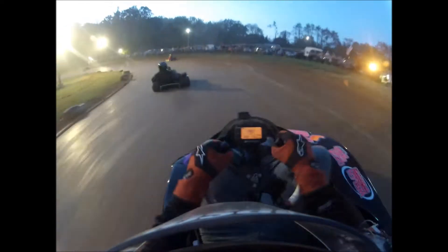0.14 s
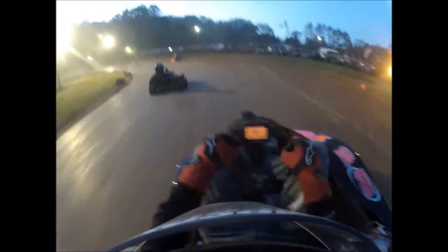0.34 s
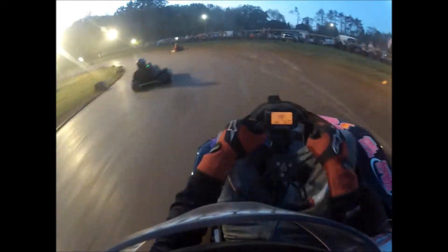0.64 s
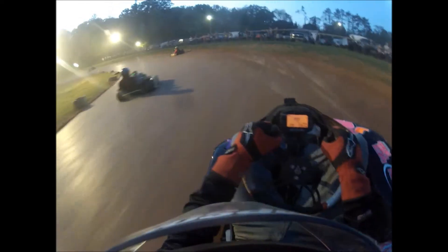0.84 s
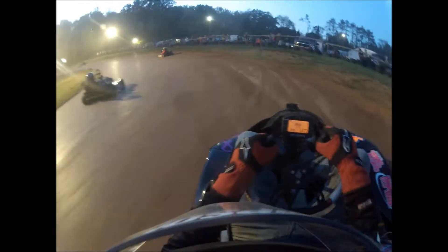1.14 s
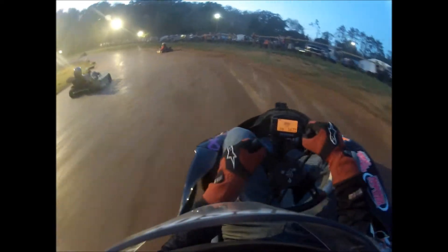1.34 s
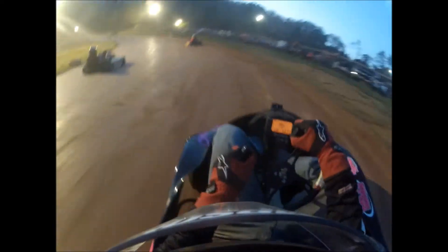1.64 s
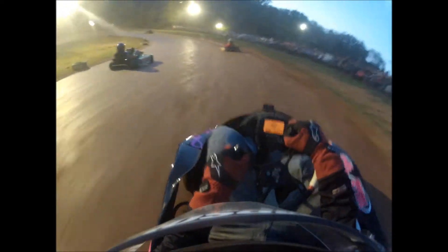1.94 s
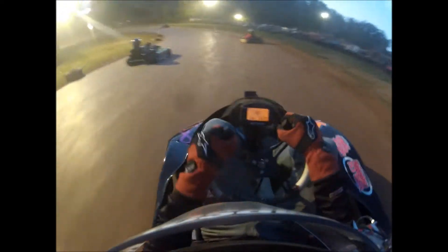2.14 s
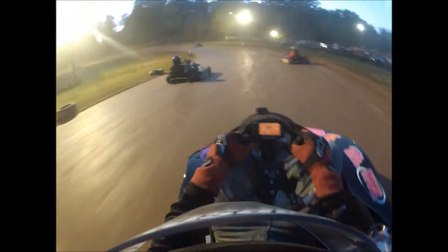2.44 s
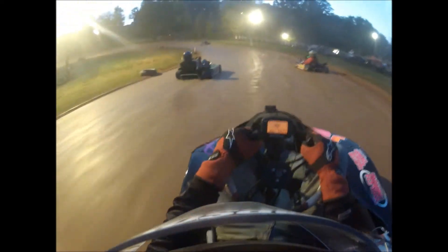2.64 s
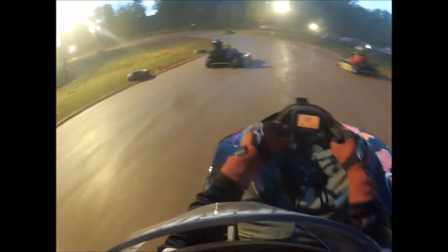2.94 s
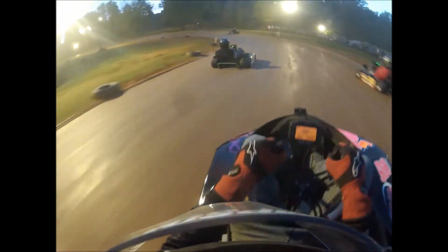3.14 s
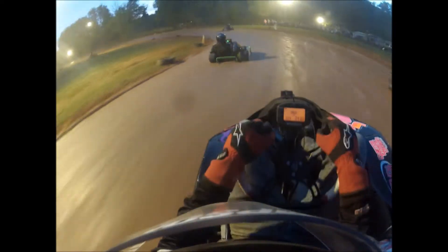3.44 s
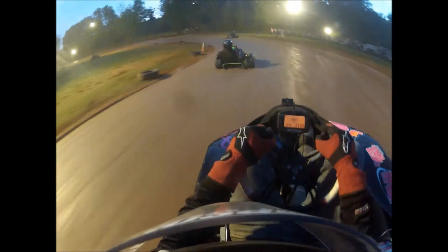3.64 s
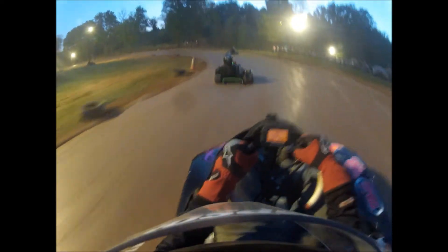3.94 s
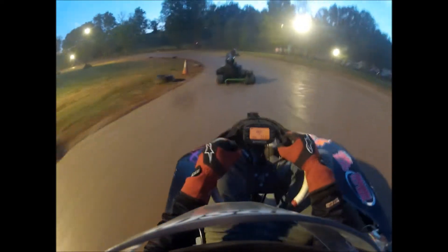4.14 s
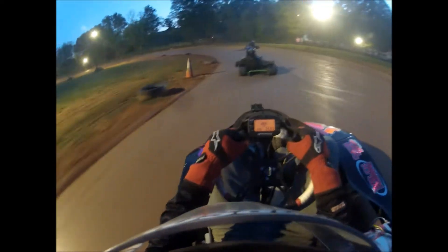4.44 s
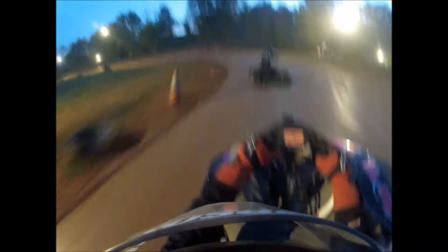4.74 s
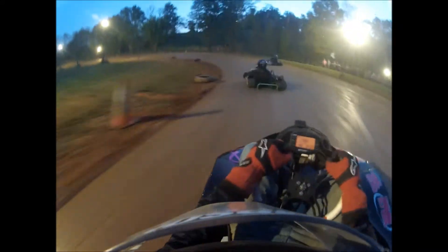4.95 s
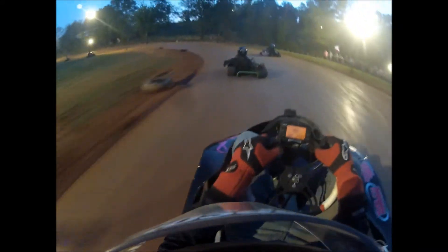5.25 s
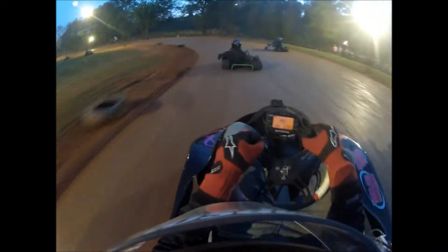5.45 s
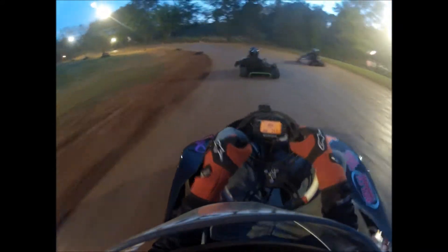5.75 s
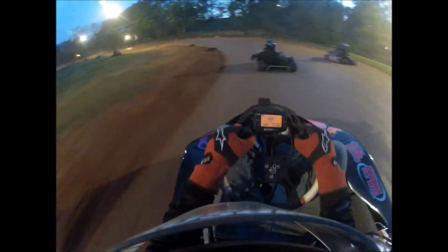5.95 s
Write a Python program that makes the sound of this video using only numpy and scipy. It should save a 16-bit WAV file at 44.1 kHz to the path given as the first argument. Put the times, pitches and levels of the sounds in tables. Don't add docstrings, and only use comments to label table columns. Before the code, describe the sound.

A single-cylinder kart engine rattles and hums on a dirt track, breaking into short runs of hard exhaust pops as the driver blips the throttle.

```python
import sys
import numpy as np
from scipy import signal
from scipy.io import wavfile

SR = 44100
rng = np.random.default_rng(int(sys.argv[2]) if len(sys.argv) > 2 else 0)


def log_audio(samples):
    frames = np.atleast_2d(samples).T
    limited = np.clip(frames, -1, 1)
    pcm = np.round(limited * 32767).astype(np.int16)
    wavfile.write(sys.argv[1], SR, pcm)


def voltage_ratio(level):
    return 10 ** (np.asarray(level, float) / 20)


N = 269451

# (pitch [Hz], level [dB], time to fall 60 dB [s])
PIPE_TONES = [
    (195.4, 1.5, 0.049),
    (179, -13.5, 0.12),
    (281.5, -2.5, 0.037),
    (360, -18.5, 0.032),
    (472, -12.5, 0.061),
]
# (pitch [Hz], width [Hz], level [dB])
HOUSING_TONES = [(694, 35, -17), (908.6, 60.6, -4), (1193, 148, -12), (1490, 140, -6.5), (1737, 117, -1),
                 (1903, 142, -9), (1938, 78, -8.5), (2410, 460, -11.5), (2756, 276, -10),
                 (2886, 250, -12.5), (3116, 330, -7), (3322, 325, -9), (3621, 397, -5.5), (3729, 292, -7.5),
                 (4200, 150, -18), (4255, 810, -20), (5076, 104, -10.5), (5395, 590, -19)]
# (pitch [Hz], width [Hz], level [dB])
FRAME_TONES = [
    (119, 44, -5),
    (217.7, 18.6, 3),
    (335, 93, -8.5),
    (398, 237, -10.5),
    (560, 95, -12),
]
# (pitch [Hz], width [Hz], level [dB])
SHELL_TONES = [
    (3584, 100, -3),
    (912, 20, -17),
    (1740, 17, -24),
    (2362, 25, -10),
    (4950, 48, -12.5),
]
# (multiple of crank speed [-], level [dB])
CRANK_SHAKES = [
    (1, 0),
    (1.5, -8),
    (2, -8),
]
# (multiple of crank speed [-], level [dB])
COASTING_TONES = [(2, -7), (2.5, 5.5), (3, 1), (3.5, 5), (4, -1.5), (4.5, 0), (5, -6), (5.5, -1), (6, -2)]
# (time [s], firing rate [Hz], level [dB])
DISTANT_DRONE = [(0.0, 33.88, -46), (0.5, 31.98, -51), (0.9, 30.46, -54), (1.55, 32.85, -56),
                 (1.77, 32.27, -46), (2.0, 35.17, -41), (2.3, 36.02, -60), (2.64, 34.6, -40.5),
                 (2.85, 32.3, -44.5), (3.05, 33.46, -41), (3.38, 31.7, -42.5), (3.64, 34.03, -53),
                 (3.93, 35.4, -41), (4.3, 35.63, -58), (4.97, 35.42, -40.5), (5.53, 32.95, -46.5),
                 (5.76, 33.57, -47), (6.11, 34.3, -41)]
# (time [s], peak level [dB])
DISTANT_POPS = [(0.0937, -18), (0.1276, -23), (0.284, -18), (0.346, -20), (0.6723, -13), (0.7451, -23),
                (0.781, -20), (0.8174, -16), (0.8533, -16), (0.886, -17), (0.97, -20), (2.4537, -16),
                (2.5399, -15.5), (2.6289, -16), (2.6548, -16.5), (2.684, -11), (3.1693, -18), (3.2976, -18),
                (3.3842, -31), (3.4116, -20), (3.4725, -17.5), (4.0038, -17), (4.0525, -16), (4.7896, -14),
                (4.8265, -19), (4.9457, -18), (5.0001, -20), (5.0875, -10), (5.3591, -18), (5.7547, -19)]
# (time [s], pitch [Hz], level [dB])
CHAIN_WHINE = [
    (4.701, 560, -38),
    (4.77, 592, -53),
    (4.93, 589.6, -58),
    (5.096, 555.0, -43),
    (5.622, 588.6, -60),
    (5.676, 558.6, -63),
    (5.78, 588, -54),
    (6.11, 587, -39),
]
# (first pop [s], first gap [ms], gap at full speed [ms], pops [count])
THROTTLE_BLIPS = [(0.497, 43.3, 26.2, 4), (1.0848, 36.8, 24.2, 5), (1.4091, 34.4, 27.5, 5),
                  (1.6745, 35.5, 29.4, 7), (2.0967, 44.4, 28.8, 6), (2.7643, 42.3, 23.5, 4),
                  (3.513, 35.2, 27.6, 4), (3.764, 35.7, 27.4, 8), (4.3621, 42.3, 31.9, 5),
                  (4.6062, 30.4, 27.7, 6), (5.0904, 37.7, 27.1, 6), (5.5171, 38.6, 28.1, 6),
                  (5.9641, 41.7, 27.0, 5)]
# (hardest crack [dB], its place in the blip [0-1], first pop weaker by [dB],
# last pop weaker by [dB], thump [dB])
BLIP_STRENGTHS = [(-10, 0.3, 3, 4.5, -16.5), (-10.5, 0.37, 1, 5.5, -16.5), (-11.5, .4, 5.5, 5, -15.5),
                  (-11.5, .65, 6, 4, -14.5), (-11, 0.87, 12.5, 8.5, -15.5), (-10.5, 0.46, 2, 5.5, -16.5),
                  (-10.5, .65, 4, 6.5, -16), (-11, 0.48, 10, 0.5, -16.5), (-11, 0.57, 9, 11, -16),
                  (-10, 0.38, 4, 3, -15), (-9.5, 0.38, 7.5, 8, -15.5), (-9.5, .55, 11, 13, -16.5),
                  (-12, 0.47, 8, 1, -16)]
# (time [s], pipe thump [dB], gas crack [dB])
STRAY_FIRINGS = [(0.063, -22, -27), (0.683, -32, -28), (0.7158, -32, -35), (0.7889, -29, -36),
                 (3.4396, -26, -27), (3.6463, -45, -25), (3.6797, -29, -26), (4.2858, -17.5, -30),
                 (4.314, -20, -22), (4.5515, -27, -24), (4.8321, -34, -25), (5.4858, -19, -25),
                 (5.7637, -22.5, -23.5), (5.9315, -22.5, -28)]
# (time [s], level [dB])
DRIVE_VIGOUR = [(0.0, -28.5), (0.41, -32.5), (0.71, -27.5), (0.95, -29.5), (1.26, -30.5), (2.07, -31.5),
                (2.33, -30.5), (2.62, -30.5), (2.94, -27), (3.23, -31.5), (3.5, -29.5), (3.71, -26.5),
                (3.84, -29.5), (4.08, -33.5), (4.34, -31), (4.59, -28), (4.88, -32.5), (6.11, -29.5)]
# (time [s], level [dB])
SEAT_SHAKE = [(0.0, -30.5), (0.13, -36.5), (0.73, -34), (1.07, -42), (1.1, -34), (1.34, -39), (1.51, -33.5),
              (1.62, -45), (1.68, -33.5), (1.84, -38), (2.82, -35.5), (3.03, -32), (3.37, -44),
              (3.76, -34.5), (4.41, -40.5), (4.56, -37.5), (6.08, -36), (6.11, -35)]
# (time [s], level [dB])
WIND_GUSTS = [(.32, -33), (.54, -34), (.68, -37), (1.1, -46), (1.51, -42), (2.65, -38), (2.77, -40.5),
              (2.95, -48.5), (3.54, -33), (4.03, -46), (4.29, -37), (4.87, -40), (5.05, -43), (5.22, -36),
              (5.68, -57), (5.87, -47), (6.04, -42)]


def rms_one(x):
    return x / np.sqrt(np.mean(x ** 2) + 1e-20)


def in_time(rows):
    times, *columns = np.transpose(rows)
    return [np.interp(np.arange(N) / SR, times, column) for column in columns]


def cut(x, hz, kind, order=2):
    return signal.sosfilt(signal.butter(order, hz, kind, fs=SR, output="sos"), x)


def drift(rate_hz):
    return rms_one(cut(rng.standard_normal(N + SR), rate_hz, "low")[SR:])


def ring(clicks, hz, t60):
    decay = voltage_ratio(-60 / (t60 * SR))
    angle = 2 * np.pi * hz / SR
    return signal.lfilter([0, np.sin(angle)], [1, -2 * decay * np.cos(angle), decay * decay], clicks + 1e-18)


def resonate(x, peaks, sway_db=0.0):
    out = np.zeros(N)
    for k, (hz, width_hz, db) in enumerate(peaks):
        decay = np.exp(-np.pi * width_hz / SR)
        feed = (1 - decay * decay) / 2 * np.array([1, 0, -1])
        rung = signal.lfilter(feed, [1, -2 * decay * np.cos(2 * np.pi * hz / SR), decay * decay], x)
        out += (-1) ** k * voltage_ratio(db + sway_db * drift(10.0)) * rung
    return out


def fade(clicks, rise_s, fall_s):
    t = np.arange(round(6 * fall_s * SR)) / SR
    shape = (1 - np.exp(-t / rise_s)) * np.exp(-t / fall_s)
    return signal.fftconvolve(clicks, shape / shape.max())[:N]


def train(times, db):
    clicks = np.zeros(N)
    places = np.clip(np.round(times * SR).astype(int), 0, N - 1)
    np.add.at(clicks, places, voltage_ratio(db))
    return clicks


def tones(crank_hz, orders):
    angle = 2 * np.pi * np.cumsum(crank_hz * (1 + 0.004 * drift(5.2))) / SR
    total = np.zeros(N)
    for multiple, db in orders:
        total += voltage_ratio(db + 2.0 * drift(6)) * np.sin(multiple * angle + multiple ** 2)
    return rms_one(total)


def blip_times():
    blips = []
    for start_s, first_ms, full_ms, count in THROTTLE_BLIPS:
        gap_left = 0.6 ** np.arange(int(count) - 1)
        gaps_ms = full_ms + (first_ms - full_ms) * gap_left
        blips.append(start_s + np.r_[0, np.cumsum(gaps_ms)] / 1000)
    return blips


def crank():
    pick_up_s, dip_hz, run_on_s = 0.05, 2.5, 0.05
    rows = [(0, 62)]
    for at in blip_times():
        hz = 2 / np.diff(at)
        rows.append((at[0] - pick_up_s, hz[0] - dip_hz))
        rows += zip((at[1:] + at[:-1]) / 2, hz)
        rows.append((at[-1] + run_on_s, hz[-1]))
    return in_time(sorted(rows))[0]


def running(crank_hz):
    (drive_db,), (shake_db,) = in_time(DRIVE_VIGOUR), in_time(SEAT_SHAKE)
    over_hz = crank_hz - 56
    thump_db = -29 + 0.42 * (drive_db - drive_db.mean()) + 0.17 * over_hz
    clatter_db = drive_db + 2 + 0.11 * over_hz
    t = np.arange(N) / SR
    gusts = voltage_ratio(-53)
    for time_s, db in WIND_GUSTS:
        gusts = gusts + voltage_ratio(db) * np.exp(-np.abs(t - time_s) / 0.043)
    return shake_db + 5.5, thump_db, clatter_db, 20 * np.log10(gusts)


def pops():
    opening_bend, closing_bend = 1.3, 1.54
    rows = []
    for at, (full_db, place, open_db, close_db, thump_db) in zip(blip_times(), BLIP_STRENGTHS):
        along, place = np.linspace(0, 1, len(at)), np.clip(place, 0.05, 0.95)
        weak = open_db * np.maximum(1 - along / place, 0) ** opening_bend
        weak += close_db * np.maximum((along - place) / (1 - place), 0) ** closing_bend
        spread = 0.5 * rng.standard_normal((len(at), 2))
        thump = thump_db - 0.38 * weak + spread[:, 0]
        crack = full_db - weak + spread[:, 1]
        rows += zip(at, thump, crack)
    return np.transpose(sorted(rows + [tuple(row) for row in STRAY_FIRINGS]))


def firings(crank_hz, thump_db, clatter_db):
    at, thump, crack = pops()
    cycles = np.cumsum(crank_hz) / SR / 2
    t = np.arange(N) / SR
    turns = np.interp(np.r_[-0.005, at], t, cycles)
    counts = np.maximum(np.round(np.diff(turns)), 1).astype(int)
    stretches = zip(turns, turns[1:], counts)
    soft_cycles = np.concatenate([np.linspace(a, b, n + 1)[1:-1] for a, b, n in stretches])
    chance = rng.standard_normal((len(soft_cycles), 3))
    soft = np.interp(soft_cycles, cycles, t) + 0.001006 * chance[:, 0]
    soft_thump = np.interp(soft, t, thump_db) - 5 + 1.5 * chance[:, 1]
    soft_crack = np.interp(soft, t, clatter_db) - 1 + 1.5 * chance[:, 2]
    return np.r_[at, soft], np.r_[thump, soft_thump], np.r_[crack, soft_crack]


def crank_hum(crank_hz, hum_db, thump_db):
    shake = voltage_ratio(hum_db - 1.5) * tones(crank_hz, CRANK_SHAKES)
    column = resonate(tones(crank_hz, COASTING_TONES), [(202.5, 54, 8), (375, 70, -15)])
    return shake + voltage_ratio(thump_db - 2.5) * rms_one(column)


def clatter(clatter_db, at):
    struck = rng.random(N) < 2500 / SR
    sizes = voltage_ratio(3.5 * np.minimum(rng.exponential(1, N), 5))
    ticks = struck * sizes * rng.choice([-1, 1], N)
    noise = rms_one(ticks) + 1.324 * rng.standard_normal(N)
    stroke = fade(train(at, 0 * at), 0.0019, 0.0059)
    return voltage_ratio(clatter_db + 12.0 + 1.0 * drift(27) + 2.0 * stroke) * noise


def frame_boom(thump_db):
    boom = rms_one(resonate(rng.standard_normal(N), FRAME_TONES))
    return voltage_ratio(thump_db - 2.5 - 1.5 * drift(7.7)) * boom


def road_rumble(hum_db):
    rumble = cut(cut(rng.standard_normal(N), 115, "low"), 65, "high")
    return voltage_ratio(hum_db - 5) * rms_one(rumble)


def wind(wind_db):
    rumble = cut(cut(rng.standard_normal(N), 46, "low"), 15, "high")
    return voltage_ratio(wind_db + 1.5 * drift(11)) * rms_one(rumble)


def distant_drone():
    firing_hz, drone_db = in_time(DISTANT_DRONE)
    beats = np.diff(np.floor(np.cumsum(firing_hz) / SR), prepend=0) * voltage_ratio(0.39 * drift(28))
    pipes = [(207, 114, -5), (352, 38, 3.0), (487, 160, -12.5), (574, 15, -6.5)]  # Hz, width Hz, dB
    return voltage_ratio(drone_db + 6.5) * rms_one(resonate(beats, pipes))


def exhaust_thump(at, thump_db):
    spread = 1.0 * rng.standard_normal((len(at), len(PIPE_TONES)))
    out = np.zeros(N)
    for k, (hz, db, t60) in enumerate(PIPE_TONES):
        out += ring(train(at - 0.0005, thump_db + db + spread[:, k]), hz, t60)
    return -voltage_ratio(4.5) * cut(cut(out, 490, "low", order=3), 126, "high")


def gas_crack(at, crack_db):
    clicks = train(at - 0.0013, crack_db)
    jet = fade(clicks, 0.0025, 0.0019)
    jet += voltage_ratio(-13) * fade(clicks, 0.004, 0.018)
    jet += voltage_ratio(-11) * fade(train(at + 0.0057, crack_db), 0.0006, 0.0018)
    jet += voltage_ratio(-9) * fade(train(at - 0.006, crack_db), 0.0032, 0.0044)
    front = cut(train(at - 0.0004, crack_db + 38), 3570, "low")
    return voltage_ratio(14.5) * jet * rng.choice([-1, 1], N) - front


def distant_pops():
    at, db = np.transpose(DISTANT_POPS)
    bursts = fade(train(at, db), 0.0008, 0.003) * rng.standard_normal(N)
    return voltage_ratio(19) * cut(cut(bursts, 2600, "high", order=3), 4200, "low", order=3)


def whine():
    first_s, first_hz, _ = CHAIN_WHINE[0]
    hz, db = in_time([(first_s - 0.3, first_hz, -70)] + list(CHAIN_WHINE))
    return np.sqrt(2) * voltage_ratio(db) * np.sin(2 * np.pi * np.cumsum(hz + 2.5 * drift(10)) / SR)


def scene():
    crank_hz = crank()
    hum_db, thump_db, clatter_db, wind_db = running(crank_hz)
    at, thump, crack = firings(crank_hz, thump_db, clatter_db)
    lows = crank_hum(crank_hz, hum_db, thump_db) + frame_boom(thump_db) + road_rumble(hum_db)
    lows += distant_drone() + exhaust_thump(at, thump) + whine()
    gas = gas_crack(at, crack)
    bright = clatter(clatter_db, at) + gas + distant_pops()
    housed = resonate(bright, HOUSING_TONES, sway_db=0.42) + resonate(gas, SHELL_TONES)
    housed += voltage_ratio(-19) * cut(cut(bright, 500, "high"), 3700, "low", order=4)
    return (housed + cut(lows, 73.6, "high", order=3) + wind(wind_db))[None]


def band_limit(x):
    return signal.sosfilt(signal.butter(12, 16140, fs=SR, output="sos"), x)


def record(dry):
    hiss = voltage_ratio(-41) * cut(rng.standard_normal(dry.shape), 4200, "high")
    narrow = cut(0.83 * np.tanh((dry + hiss) / 0.86), 7800, "low", order=5)
    hold_hz = 12000
    slow = signal.resample_poly(narrow, hold_hz // 300, SR // 300, axis=1)
    steps = np.repeat(slow, 4, axis=1)
    held = signal.resample_poly(steps, SR // 300, 4 * hold_hz // 300, axis=1)
    top_cut = signal.cheby2(14, 60, 15880, fs=SR, output="sos")
    return band_limit(signal.sosfilt(top_cut, held[:, :N]))


dry = scene()
out = record(dry)
log_audio(out)
```